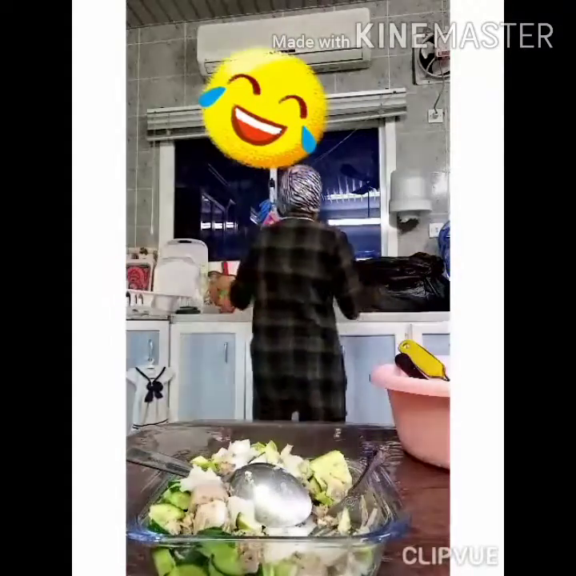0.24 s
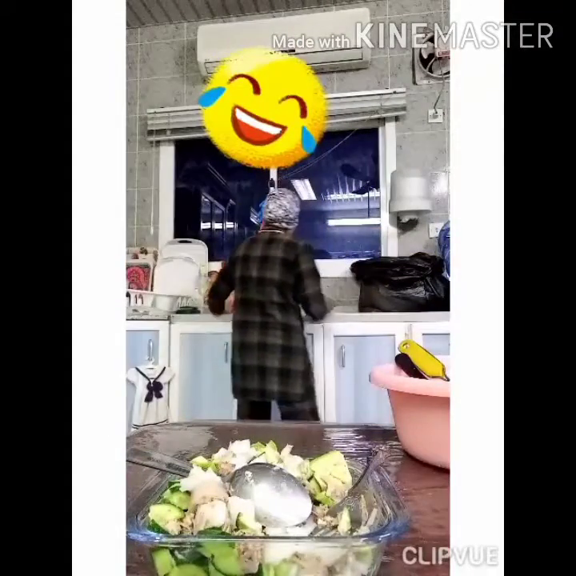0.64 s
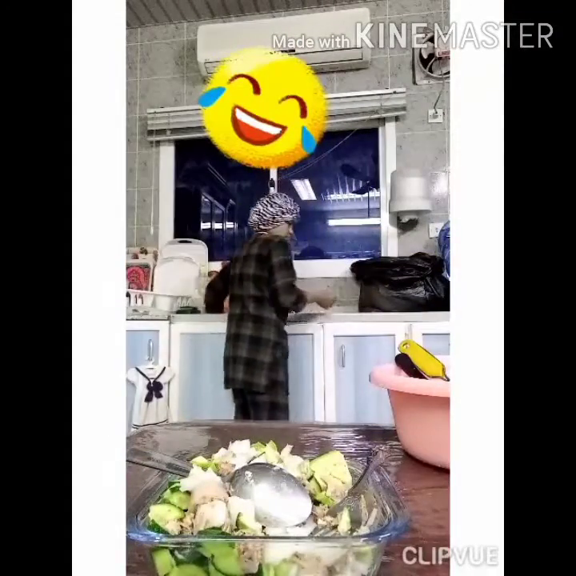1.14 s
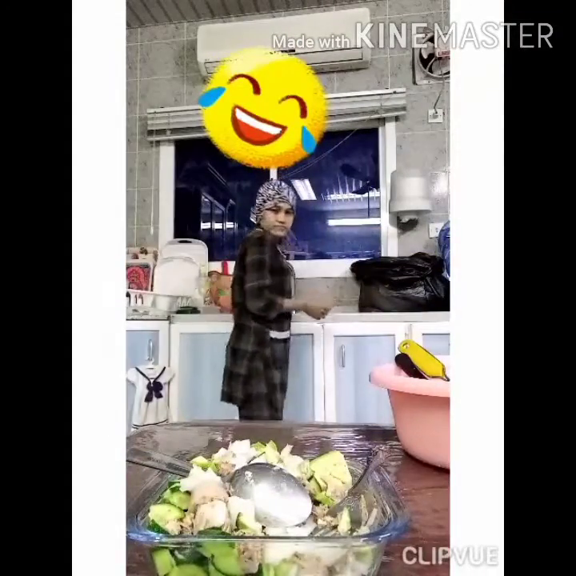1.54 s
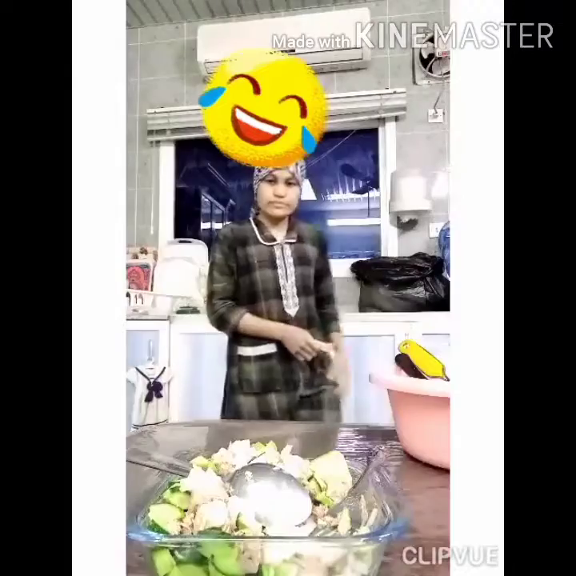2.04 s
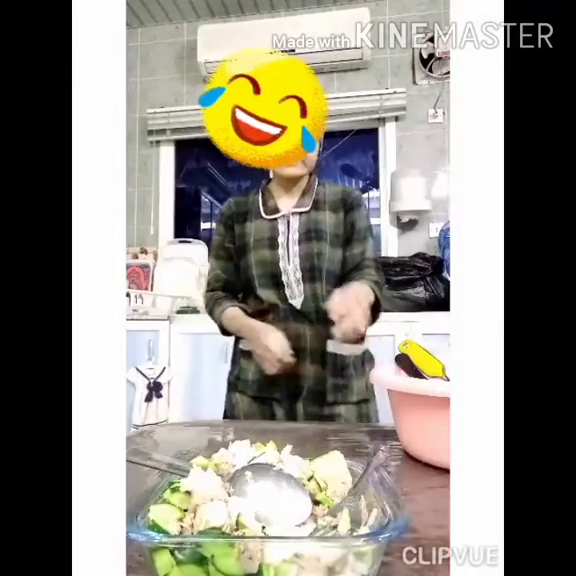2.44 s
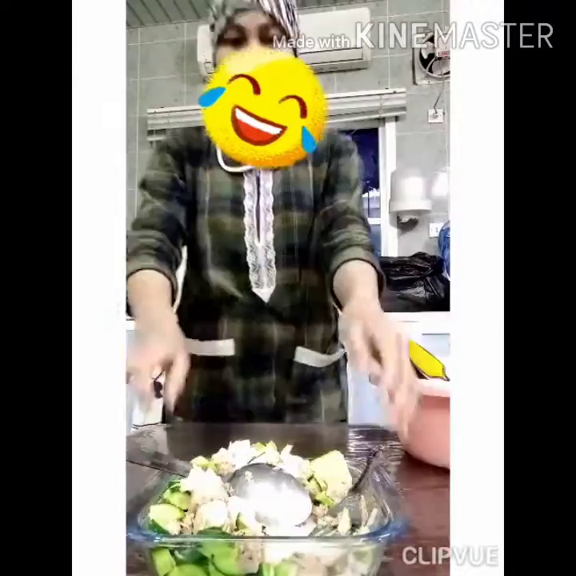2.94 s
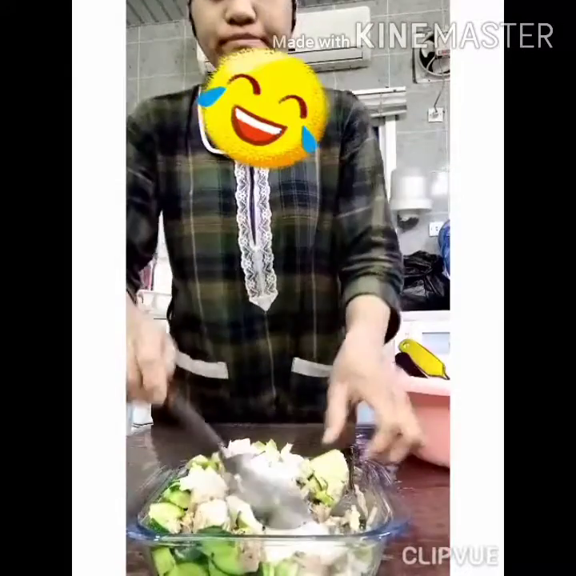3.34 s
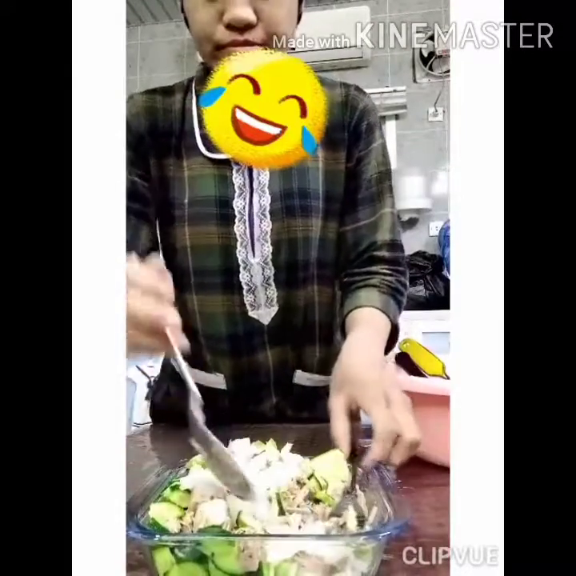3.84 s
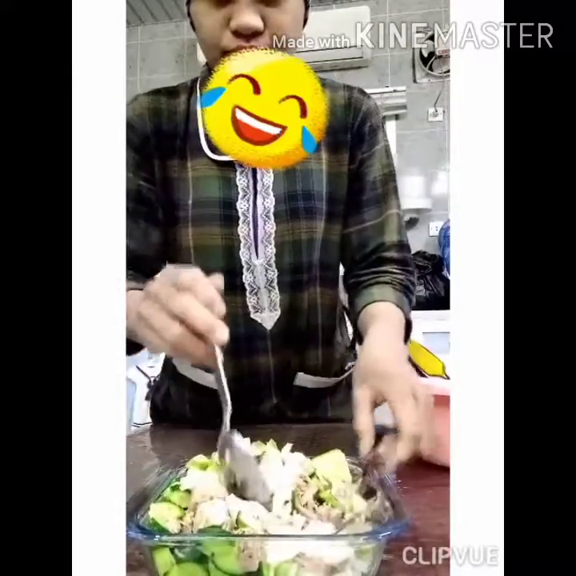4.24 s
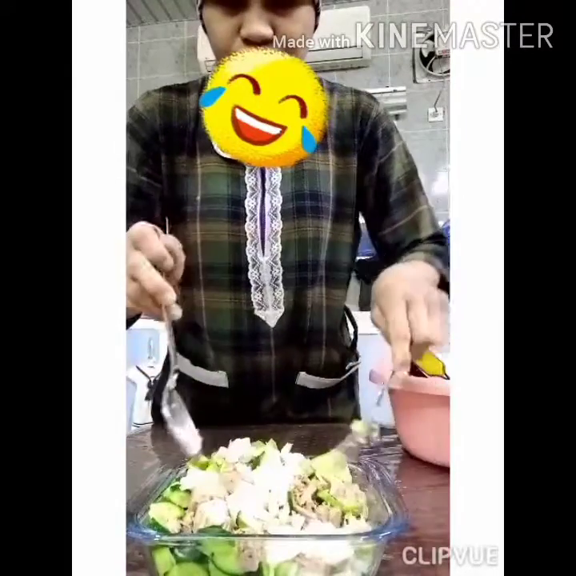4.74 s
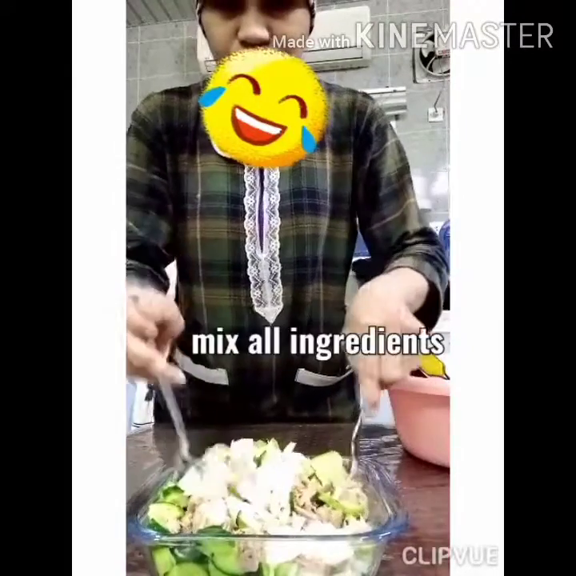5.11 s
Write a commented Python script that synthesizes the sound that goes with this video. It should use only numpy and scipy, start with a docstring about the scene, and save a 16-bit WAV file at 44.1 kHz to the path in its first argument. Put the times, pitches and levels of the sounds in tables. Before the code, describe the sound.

Clothes swish with steps, kitchenware lands with a loud echoing clatter across the room, then close steel cutlery clinks and scrapes in a full glass bowl.

```python
"""Tossing a salad in a tiled kitchen

An air conditioner (coloured noise and wavering tones) hums, and clothes (swelling noise) swish with each step.
At the far counter something is knocked and kitchenware clatters: damped sines, noise bursts and room echo.
Close to the microphone a steel spoon and fork toss a salad in a glass bowl: ticks and rings at each contact,
low thumps in the table, rustling crowds of tiny slips in the salad, and squeaks of steel along the glass."""
import sys
import numpy as np
from scipy import signal
from scipy.fft import rfft, irfft
from scipy.io import wavfile

SR = 44100
rng = np.random.default_rng(int(sys.argv[2]) if len(sys.argv) > 2 else 0)


def unload_audio(sound):
    """Save the sound as a 16-bit wav file, at the path given as the first command line argument."""
    columns = np.transpose(np.atleast_2d(sound))
    # keep every value between -1 and 1, then stretch to whole-number steps
    steps = np.round(np.clip(columns, -1, 1) * 32767)
    wavfile.write(sys.argv[1], SR, steps.astype(np.int16))


N = 236714
TIME = np.arange(N) / SR
RING_TIME = TIME[:SR]   # one second


def from_db(db):
    """Decibels to gain."""
    return 10 ** (np.asarray(db) / 20)


def rms_one(x):
    """Scale to unit rms."""
    return x / np.sqrt(np.mean(x ** 2) + 1e-20)


def at_hz(points, hz):
    """Read a table between its points, on a log-frequency axis."""
    point_hz, value = np.array(points).T
    return np.interp(np.log(hz + 1), np.log(point_hz), value)


def add(track, s, sound):
    """Mix a sound into the track from time s on."""
    at = round(s * SR)
    track[at:at + len(sound)] += sound[:N - at]


def high_pass(x, hz):
    """Third-order bass cut."""
    return signal.sosfilt(signal.butter(3, hz, "high", fs=SR, output="sos"), x)


def noise(spectrum, size, tilt_db=0):
    """Noise of a given colour, tilted by dB per octave; rms 1."""
    hz = np.arange(size // 2 + 1) * SR / size
    gain = from_db(at_hz(spectrum, hz) + tilt_db * np.log2(hz + 1))
    return rms_one(irfft(rfft(rng.standard_normal(size)) * gain, size))


CONTACT_S = 0.00093   # the ring builds up while the two things touch


def ring(modes, tilt_db, pivot_hz, vary_db, detune):
    """Damped sines; each blow shares its strength differently, and grip and load shift the pitches a little."""
    hz, db, t60 = np.array(modes, float).T[:, :, None]
    hz = hz * (1 + detune * rng.standard_normal(hz.shape))
    gain = from_db(db + tilt_db * np.log2(hz / pivot_hz) + vary_db * rng.standard_normal(hz.shape))
    # low modes move as one; the sign of higher ones depends on the spot struck
    gain *= np.where(hz < 700, 1, rng.choice([-1, 1], hz.shape))
    t = RING_TIME[:SR // 2].astype(np.float32)
    fading = np.exp(np.float32(-np.log(1000) / t60) * t)
    sines = gain * fading * np.sin(np.float32(2 * np.pi * hz) * t)
    return np.sum(sines, axis=0) * (1 - np.exp(-t / CONTACT_S))


# how long the room's echo takes to fall by 60 dB: pitch_hz [Hz], fade_s [s]
ECHO_FADE = [(100, 0.88), (500, 0.52), (1500, 0.59), (4000, 0.51), (7000, 0.4), (15000, 0.16)]


def kitchen(x, delay_s, build_s):
    """Diffuse echo of the tiles at unit gain: it builds up, then the treble dies first."""
    size = len(RING_TIME)
    white = rfft(rng.standard_normal(size))
    hz = np.arange(size // 2 + 1) * SR / size
    edges = np.r_[0, np.geomspace(200, SR / 2, 12)]
    echo = np.zeros(size)
    for low, high in zip(edges, edges[1:]):
        band = irfft(white * (hz >= low) * (hz < high), size)
        echo += band * from_db(-60 * RING_TIME / at_hz(ECHO_FADE, (low + high) / 2))
    echo = echo * (1 - np.exp(-np.maximum(RING_TIME - delay_s, 0) / build_s))
    return signal.fftconvolve(x, echo / np.sqrt(np.sum(echo ** 2)))[:N]


# colour of the fan's rush: pitch_hz [Hz], level_db [relative dB per Hz]
FAN_RUSH = [(25, -52), (45, -13.5), (62, -4.5), (100, -14), (160, -6.5), (260, 1.5), (350, -3.5), (500, -5),
            (800, -11), (1300, -18.5), (2500, -29.5), (7000, -36.5), (8500, -50.5), (15500, -50.5)]
# motor tones: pitch_hz [Hz], level_db [dB, peak of the steady part]
MOTOR_TONES = [(102.3, -78), (204.6, -57), (300, -68), (409.1, -64.5), (473.7, -77), (710.6, -84.5),
               (802.5, -71)]


def air_conditioner():
    """Fan rush as coloured noise, with motor tones that waver in phase and strength."""
    out = from_db(-57.5) * noise(FAN_RUSH, size=N)
    slow = [(1, 0), (4, -3), (12, -18), (60, -60), (300, -120)]   # pitch_hz, relative dB per Hz
    for hz, db in MOTOR_TONES:
        waver = 0.49 * (noise(slow, size=N) + 1j * noise(slow, size=N))
        out = out + from_db(db) * np.real((1 + waver) * np.exp(2j * np.pi * hz * TIME))
    return out


# swishes of clothing, one a step: peak_s [s], level_db [dB before mixing], rise_s [s]
SWISHES = [(0.166, -62.5, 0.058), (.61, -69, 0.057), (0.991, -67.5, 0.09), (1.281, -69, 0.11),
           (1.996, -79.5, 0.2), (2.25, -63, 0.072), (2.711, -65.5, 0.051), (2.98, -73, 0.081),
           (3.15, -66.5, 0.098)]
# colour of the cloth before brightening: pitch_hz [Hz], level_db [relative dB per Hz]
CLOTH = [(500, 3), (1500, 6.5), (3000, 2), (5000, 1.5), (7500, 0.5), (9000, -11), (13000, -27),
         (15300, -11)]
SWISH_FADE_RATIO = 1.74   # fade time over rise time
SWISH_BRIGHT_DB, FOLDS_DB = 4, 2   # tilt in dB per octave; unevenness in dB


def clothes():
    """Cloth rubs on cloth with each step: a quick swell and a slower fade, uneven as the folds catch."""
    out = np.zeros(N)
    fold_colour = [(1, -10), (30, 0), (90, -12), (400, -60), (2000, -120)]   # pitch_hz, relative dB per Hz
    for s, db, rise_s in SWISHES:
        start = max(s - .5, 0)
        t = RING_TIME + start - s   # zero at the peak
        swell = np.exp(-(t / (rise_s * np.where(t < 0, 1, SWISH_FADE_RATIO))) ** 2)
        folds = from_db(FOLDS_DB * noise(fold_colour, size=SR))
        add(out, start, from_db(db) * noise(CLOTH, size=SR, tilt_db=SWISH_BRIGHT_DB) * swell * folds)
    return from_db(1.6) * out + from_db(-2.0) * kitchen(out, delay_s=0.0045, build_s=0.0089)


def counter_filter(x):
    """High-pass filter, and a steep low-pass at 7.7 kHz with some of the unfiltered sound mixed back in."""
    low_passed = signal.sosfilt(signal.butter(8, 7700, fs=SR, output="sos"), x)
    return high_pass(low_passed + from_db(-14.5) * x, hz=139.0)


EDGE_LEAD_S = .0075   # one edge touches this long before the object lands flat
REBOUND_S, REBOUND_KEEPS = .0078, .9   # typical first hop; share of its length that the next hop keeps


def landing(s, edge_db, loss_db, count):
    """An edge touches, the object lands flat, then hops ever weaker: rows (s, dB against the main blow)."""
    hop = np.arange(count)
    hop_s = REBOUND_S * REBOUND_KEEPS ** hop * rng.uniform(.9, 1.1, count)
    times = s + np.cumsum(hop_s)
    return [(s - EDGE_LEAD_S, edge_db), (s, 0), *zip(times, -loss_db * (hop + 1))]


# colour of the far impacts before tilting: pitch_hz [Hz], level_db [relative dB per Hz]
CRACK_COLOUR = [(60, -22.5), (140, -39.5), (260, 1), (480, -1.5), (680, -7), (1100, 0), (1700, 2),
                (2400, -3), (3050, -2.5), (3600, -5.5), (4200, -7.5), (5500, -14.5), (7000, -18.5),
                (8500, -36), (15000, -39.5)]


def crack(decay_s, rise_s, tilt_db):
    """The crowd of heavily damped modes that a hard blow wakes for a few milliseconds."""
    t = RING_TIME[:4096]
    swell = np.exp(-t / decay_s) * (1 - np.exp(-t / rise_s))
    return noise(CRACK_COLOUR, size=4096, tilt_db=tilt_db) * swell / swell.max()


# a hollow object is set down and bounces: start_s [s], level_db [dB before mixing]
KNOCKS = [(1.1101, -34.5), (1.143, -40.5), (1.177, -50.5)]
# what the knock rings with: pitch_hz [Hz], level_db [relative dB], fade_s [s to fall 60 dB]
COUNTER_MODES = [(333, -12.5, 0.14), (399.3, -6, 0.11), (448.3, -2.5, 0.087), (473, -1.5, 0.07),
                 (508, 1.5, 0.26), (543, -6, 0.34), (898, -5.5, 0.15), (1220, -9, 0.07), (1380, -1.5, 0.11),
                 (1562, -10.5, 0.08), (1680, -1, 0.087), (2110, -4.5, 0.082), (2366, -11.5, 0.05),
                 (2700, -5.5, 0.05), (3184, -8, 0.065), (3580, -18, .05), (4700, -9, 0.06),
                 (7400, -22.5, .05)]
KNOCK_CRACK_DB = -2.5   # crack against ring, before mixing


def knock():
    """A hollow, bouncing knock on the far counter: damped sines and short noise bursts."""
    body, cracks = np.zeros((2, N))
    for landed_s, db in KNOCKS:
        for s, touch_db in landing(landed_s, edge_db=-7.5, loss_db=4.5, count=1):
            body_ring = ring(COUNTER_MODES, tilt_db=-3, pivot_hz=503.0, vary_db=2.5, detune=0.021)
            add(body, s, from_db(db + touch_db) * body_ring)
            burst = crack(decay_s=0.0054, rise_s=0.0012, tilt_db=4.5)
            add(cracks, s, from_db(db + touch_db + KNOCK_CRACK_DB) * burst)
    near = from_db(-1) * body + from_db(-3.5) * cracks
    to_room = from_db(-9.0) * body + from_db(-10.5) * cracks
    return counter_filter(near + kitchen(to_room, delay_s=0.002, build_s=0.0091))


# kitchenware lands, rocks and lands again: start_s [s], crack_db, ring_db [dB before mixing],
# brightness_db [dB per octave], thud_db [dB before mixing]
CLATTER = [(1.3791, -12, -28, 1.5, -50), (1.394, -23.5, -39.5, -2, -50.5), (1.4076, -25.5, -42, 6.5, -54),
           (1.4236, -22.5, -35.5, -2, -48.5), (1.438, -23, -38.5, 1.5, -48), (1.4745, -18, -28, -.5, -56),
           (1.511, -31, -40, -1.5, -57)]
# modes of the kitchenware: pitch_hz [Hz], level_db [relative dB], fade_s [s to fall 60 dB]
WARE_MODES = [(263.4, -8.5, 0.17), (398.5, -8.5, 0.33), (526.7, -6, 0.39), (800, -7, 0.24),
              (942, -5.5, 0.2), (1043, 1, 0.1), (1138, -5, 0.045), (1187, -2.5, 0.1425), (1398, 0.5, 0.11),
              (1386, -3.5, 0.11), (1470, -8, 0.1497), (1630, -7.5, 0.18), (1663, 0, 0.088),
              (1890, -2.5, 0.07), (2330, -7, 0.07), (2430, 0, 0.045), (2530, -2.5, 0.0479),
              (2718, 0, 0.049), (3000, -3.5, 0.08), (3480, 0, 0.047), (3540, -6.5, 0.052),
              (3710, -12.5, 0.06), (4610, -8.5, 0.1), (4805, -8, 0.0236), (5160, -16, .05),
              (6280, -8, 0.033)]
# the cupboard under the counter thuds: pitch_hz [Hz], level_db [relative dB], fade_s [s to fall 60 dB]
CUPBOARD_MODES = [(88, -14, .2), (118, -6.5, .18), (165.2, -2, 0.22), (238, 3.5, 0.17)]


def clatter():
    """Kitchenware lands, rocks and lands again; it rings and cracks with room echo, and the cupboard thuds."""
    rings, cracks, thuds = np.zeros((3, N))
    for landed_s, crack_db, ring_db, bright_db, thud_db in CLATTER:
        thud = ring(CUPBOARD_MODES, tilt_db=-1, pivot_hz=150, vary_db=0.5, detune=0.017)
        add(thuds, landed_s, from_db(thud_db) * thud)
        for s, touch_db in landing(landed_s, edge_db=-6, loss_db=5.0, count=2):
            ware_ring = ring(WARE_MODES, bright_db, pivot_hz=1450, vary_db=2.5, detune=0.008)
            add(rings, s, from_db(ring_db + touch_db) * ware_ring)
            burst = crack(decay_s=0.003, rise_s=0.0007, tilt_db=bright_db)
            add(cracks, s, from_db(crack_db + touch_db) * burst)
    near = from_db(1.0) * rings + from_db(-6.5) * cracks
    to_room = from_db(-13.0) * rings + from_db(-4.5) * cracks
    boom = thuds + from_db(-8.5) * kitchen(thuds, delay_s=0.0034, build_s=0.008)
    return boom + counter_filter(near + kitchen(to_room, delay_s=0.0021, build_s=0.0035))


SPOT_OCTAVES = 0.14   # reach of the lift around the favoured pitch


def favour(hz, favoured_hz, lift_db):
    """The spot touched feeds the resonances near one pitch best: their lift in dB."""
    return lift_db * np.exp(-(np.log2(hz / favoured_hz) / SPOT_OCTAVES) ** 2)


# stiff resonances heard only at the instant of contact: pitch_hz [Hz], width_hz [Hz], level_db [relative dB]
TICK_RESONANCES = [(650, 140, -23), (1494, 116, 0), (1810, 140, 2.5), (2230, 250, -6.5), (3352, 160, 2.5),
                   (3800, 104, 4), (4950, 230, 3.5), (5720, 320, -7), (6250, 120, -3.5), (6770, 58, 4.5),
                   (7160, 43, -5), (8540, 100, -14), (9160, 180, -14), (11250, 250, -13), (12300, 250, -20),
                   (12600, 250, -19), (14100, 430, -10), (15900, 640, -1)]
TOP_TREBLE_HZ = 9000   # above this the colour depends on which edge of the steel touches
CLEAN_HIT_S = 0.0007   # contacts shorter than this are one clean blow, longer ones mostly skid
SPOT_WIDTH_HZ, SPOT_DB = 170, 5.5   # the spot's own resonance
SPOT_SHIFT = 0.0053   # typical share by which each resonance moves


def tick(length_s, bright_db, favoured_hz, lift_db, top_db):
    """Steel hits glass and skids: a blow and tiny slips wake stiff resonances that depend on the spot touched."""
    t = RING_TIME[:4096]
    slips = rng.standard_normal(len(t)) * np.exp(-t / length_s) * (1 - np.exp(-t / (0.91 * length_s)))
    slips = slips / np.sqrt(np.sum(slips ** 2))
    blow = np.array([(CLEAN_HIT_S / length_s) ** 2])
    add(slips, length_s / 2, blow)
    out = 0
    for hz, width_hz, db in TICK_RESONANCES + [(favoured_hz, SPOT_WIDTH_HZ, SPOT_DB)]:
        hz = hz * (1 + SPOT_SHIFT * rng.standard_normal())
        # a two-pole resonator
        r = np.exp(-np.pi * width_hz / SR)
        poles = [1, -2 * r * np.cos(2 * np.pi * hz / SR), r * r]
        band = signal.lfilter([1 - r * r, 0, r * r - 1], poles, slips)
        colour_db = bright_db * np.log2(hz) + favour(hz, favoured_hz, lift_db) + top_db * (hz > TOP_TREBLE_HZ)
        out = out + from_db(db + colour_db) * band
    return out * np.sqrt(length_s * SR / np.sum(out ** 2))


# crowd of weak modes in spoon and fork: pitch_hz [Hz], level_db [relative dB of each]
CLANK = [(1500, -1.5), (2500, -2.5), (4000, -14), (5200, -36), (6200, -33), (7200, -8), (8100, -23),
         (9500, -16), (12000, -28), (15300, -20)]
CLANK_MEAN_T60_S = 0.092   # each mode takes from half to one and a half times this to fall 60 dB


def clank(count):
    """The steel has a crowd of weak, short modes; each blow wakes a different set: rows (Hz, dB, t60 s)."""
    place, life = rng.random((2, count))
    low_hz, high_hz = CLANK[0][0], CLANK[-1][0]
    hz = low_hz + (high_hz - low_hz) * (np.arange(count) + place) / count
    return np.transpose([hz, at_hz(CLANK, hz), CLANK_MEAN_T60_S * (.5 + life)])


# cutlery meeting the bowl: start_s [s], tick_db [dB before mixing], contact_s [s], steel_db, glass_db
# [ring, dB before mixing], favoured_hz [Hz], lift_db [dB near that pitch], top_treble_db [dB]
CLINKS = [(3.233, -38.5, 0.0037, -47, -55, 1880, 4, 3), (3.243, -37, 0.0079, -53, -69, 2750, 0, 3),
          (3.303, -29.5, 0.0012, -61, -63, 6500, 7, 2), (3.324, -53, 0.0024, -71, -80, 5500, 11, -3),
          (3.3333, -30.5, 0.0028, -46, -73, 4640, 5, 9), (3.355, -45, 0.0056, -53, -67, 4900, -1, 3),
          (3.9, -63, 0.0023, -93, -80, 1300, 8, -6), (4.018, -34.5, 0.0059, -63, -63, 2150, -3.5, -5),
          (4.061, -47, 0.006, -67, -76, 2400, 7, -5), (4.084, -47, 0.011, -65, -73, 2360, -3, -7),
          (4.1357, -38, 0.0056, -58.5, -79, 4840, -3.5, -5), (4.163, -40, 0.0031, -80, -63, 6350, 7, 4),
          (4.256, -37.5, 0.0044, -65, -70, 4720, 3, -4), (4.287, -42, 0.004, -90, -82, 2020, 11, 0),
          (4.304, -36.5, 0.0018, -78, -78, 4550, -1, 0), (4.392, -59, 0.0016, -90, -88, 5400, 21, -8),
          (4.477, -57, 0.0059, -91, -70, 6800, 0, 0), (4.959, -60, 0.0022, -99, -91, 7140, 37, -8),
          (5.0559, -19.5, 0.0009, -61, -34, 5060, 11, 0), (5.0613, -27, 0.0019, -70, -68, 1790, 2.5, -4),
          (5.281, -51.5, 0.0035, -93, -82, 4200, 9, -16), (5.301, -40.5, .0015, -83, -79, 5600, 1, 4)]
# spoon and fork: pitch_hz [Hz], level_db [relative dB], fade_s [s to fall 60 dB]
STEEL_MODES = [(1730, -9, 0.13), (1897, -7, 0.16), (2240, -5.5, 0.076), (2290, -8, 0.17),
               (3240, 6.5, 0.077), (3270, -1, 0.19), (3745, -3, 0.12), (4465, -6.5, 0.21), (5060, -13, .11),
               (7000, -7.5, 0.22), (7290, -12.5, 0.43), (7450, -10, .12), (8650, -9, 0.15), (9330, 2, 0.12),
               (9300, -9, 0.15), (9200, 1, 0.066), (11060, -10.5, 0.2), (11100, -10, 0.091),
               (11500, -13, 0.098), (12430, -16, 0.13), (12640, -18, 0.13), (13310, -16, 0.11),
               (14450, -7, .05), (14700, -9, 0.054), (15400, -7, 0.12)]
# the filled glass bowl: pitch_hz [Hz], level_db [relative dB], fade_s [s to fall 60 dB]
GLASS_MODES = [(1445, -13, 0.44), (1484.5, -5.5, 0.42), (1560, -7.5, 0.24), (1934, -16, 0.22),
               (3310, -2, 0.047), (3235, -9.5, 0.068), (3650, -14, 0.089), (3762, -16.5, 0.25),
               (3880, -13.5, 0.1), (4940, -45, 0.029), (5130, -8, 0.06), (5400, -18, 0.095),
               (6160, -14, 0.11), (6300, -27.5, 0.1), (7430, -17, 0.14), (8730, -16, 0.098),
               (11100, -30, 0.17), (11700, -23, 0.08), (12400, -24, 0.07), (13780, -23, 0.14),
               (14890, -23, 0.15)]
USUAL_CLINK_DB, USUAL_CONTACT_S = -38, 0.0028   # an ordinary contact
# its tilt in dB per octave; stronger contacts are brighter, longer ones duller
CLINK_BRIGHT_DB, BRIGHT_PER_DB, DULL_PER_DOUBLING_DB = 1.5, 0.1367, 0.3
SKIP_S, SKIP_LOSS_DB = .006, 26   # the steel skips and touches once more
SPOT_RING_SHARE = 0.84   # share of the spot's lift that the steel's long ring gets
GLASS_TILT_DB = -2   # per octave: the salad muffles the bowl's upper modes


def cutlery():
    """Every contact ticks, skips once and leaves both the steel and the bowl ringing."""
    ticks, steel, glass = np.zeros((3, N))
    for s, tick_db, length_s, steel_db, glass_db, favoured_hz, lift_db, top_db in CLINKS:
        strength_db = BRIGHT_PER_DB * (tick_db - USUAL_CLINK_DB)
        dulling_db = DULL_PER_DOUBLING_DB * np.log2(length_s / USUAL_CONTACT_S)
        bright_db = CLINK_BRIGHT_DB + strength_db - dulling_db
        add(ticks, s, from_db(tick_db) * tick(length_s, bright_db, favoured_hz, lift_db, top_db))
        skip = tick(2 * length_s, bright_db, favoured_hz=3650, lift_db=4.0, top_db=top_db)
        add(ticks, s + SKIP_S, from_db(tick_db - SKIP_LOSS_DB) * skip)
        modes = [(hz, db + favour(hz, favoured_hz, SPOT_RING_SHARE * lift_db), t60)
                 for hz, db, t60 in [*STEEL_MODES, *clank(count=96)]]
        steel_ring = ring(modes, bright_db, pivot_hz=5790, vary_db=2, detune=0.00302)
        add(steel, s, from_db(steel_db) * steel_ring)
        glass_ring = ring(GLASS_MODES, bright_db + GLASS_TILT_DB, pivot_hz=2000, vary_db=0.2, detune=0.0021)
        add(glass, s, from_db(glass_db) * glass_ring)
    # the bowl stands right at the microphone, so its ring is mostly direct
    bowl = glass + from_db(-14) * kitchen(glass, delay_s=.002, build_s=.004)
    near = from_db(-2.5) * ticks + from_db(3.5) * steel + from_db(4.0) * bowl
    to_room = from_db(-12.0) * ticks + from_db(-9) * steel
    return near + kitchen(to_room, delay_s=0.0012, build_s=0.0018)


# the bowl bumps on the table: start_s [s], level_db [dB before mixing], pitch_hz [Hz]
BUMPS = [(3.238, -43, 153), (3.305, -38.5, 178), (3.313, -39, 153), (3.334, -41.5, 98), (3.905, -52.5, 145),
         (4.089, -55, 164), (4.142, -60, 148), (4.166, -48.5, 111), (4.251, -54, 187), (5.036, -56, 116),
         (5.056, -43, 127), (5.065, -57, 71.5), (5.088, -52, 115), (5.121, -48.5, 172), (5.235, -57, 89),
         (5.304, -49.5, 141)]
TABLE_T60_S, BUMP_RISE_S = 0.13, 0.003   # time to fall 60 dB; the bowl lands softly


def table_top():
    """Low thumps (fading sines) travel from the bowl through the table, with a little wooden knock (noise)."""
    out = np.zeros(N)
    dying = np.exp(-np.log(1000) * RING_TIME / TABLE_T60_S) * (1 - np.exp(-RING_TIME / BUMP_RISE_S))
    # pitch_hz, relative dB per Hz
    wood_colour = [(30, -18), (150, 14.0), (400, -1.5), (650, 0.5), (1500, -21.5), (4000, -13), (12000, -73)]
    for s, db, hz in BUMPS:
        wood = from_db(2) * noise(wood_colour, size=SR)
        thump = from_db(2.5) * np.sin(2 * np.pi * hz * RING_TIME)
        add(out, s, from_db(db) * (thump + wood) * dying)
    return high_pass(out + from_db(-21.0) * kitchen(out, delay_s=0.0024, build_s=0.013), hz=39)


# the spoon slides through the salad: peak_s [s], level_db [dB before mixing], half_length_s [s]
SLIDES = [(3.284, -53, 0.042), (3.389, -59.5, 0.059), (3.478, -68, .05), (4.087, -55, 0.049),
          (4.197, -63, 0.032), (4.328, -59.5, .05), (4.417, -79, .06), (5.14, -55, 0.022),
          (5.337, -69, 0.076)]
# colour of one tiny slip: pitch_hz [Hz], level_db [relative dB per Hz]
SALAD_COLOUR = [(300, 9.5), (600, 16.5), (1200, -17), (2200, 4.5), (3400, -5), (4200, -23), (5200, -17),
                (7000, -3), (8500, -20), (15000, -39)]
SALAD_SLIPS_PER_S = 2500   # on average


def salad():
    """Chopped vegetables slide and stick against steel and glass in a crowd of tiny slips."""
    out = np.zeros(N)
    grain = noise(SALAD_COLOUR, size=256) * np.hanning(256)
    for s, db, half_s in SLIDES:
        swell = np.exp(-((RING_TIME - .5) / half_s) ** 2)
        happens = rng.random(SR) < SALAD_SLIPS_PER_S / SR
        slips = happens * rng.standard_normal(SR) * from_db(3.6 * rng.standard_normal(SR))
        rustle = rms_one(signal.fftconvolve(slips, grain, "same"))
        add(out, s - .5, from_db(db) * rustle * swell)
    return from_db(1) * out + kitchen(from_db(-3) * out, delay_s=0.00087, build_s=0.00065)


# steel scrapes along the glass and squeaks: start_s [s], level_db [dB before mixing], length_s [s]
SCRAPES = [(4.061, -48, .022), (4.076, -49, 0.018)]
# the modes that sing in a scrape: pitch_hz [Hz], level_db [relative dB], fade_s [s to fall 60 dB]
SQUEAK_MODES = [(2310, -3, 0.055), (3266, -5, 0.057), (6900, 1, 0.057), (7140, -2, .06), (9280, -17, 0.053),
                (11100, -17, .06)]
SCRAPE_SLIPS_PER_S = 900   # on average: the steel sticks and slips unevenly


def scrapes():
    """The spoon's edge sticks and slips on the glass; the uneven slips keep a few modes singing."""
    out = np.zeros(N)
    for s, db, length_s in SCRAPES:
        size = round(length_s * SR)
        slips = (rng.random(SR) < SCRAPE_SLIPS_PER_S / SR) * rng.uniform(0.33, 1, SR)
        singing = ring(SQUEAK_MODES, tilt_db=2, pivot_hz=5000, vary_db=4.0, detune=0.0024)
        squeak = signal.fftconvolve(slips[:size], singing)
        loudness = np.sqrt(np.mean(squeak[:2 * size] ** 2) + 1e-20)
        add(out, s, from_db(db) * squeak / loudness)
    return from_db(-5.5) * out + from_db(-13.5) * kitchen(out, delay_s=0.0015, build_s=0.003)


def scene():
    """Everything at one microphone on the table."""
    background = air_conditioner() + clothes()
    far_counter = knock() + clatter()
    bowl = cutlery() + table_top() + salad() + scrapes()
    return (background + far_counter + bowl)[None]


CUTOFF_HZ = 15600


def record(dry):
    """The top is cut steeply by a low-pass filter."""
    return signal.sosfilt(signal.ellip(12, .1, 80, CUTOFF_HZ, fs=SR, output="sos"), dry)


dry = scene()
out = record(dry)
unload_audio(out)
```